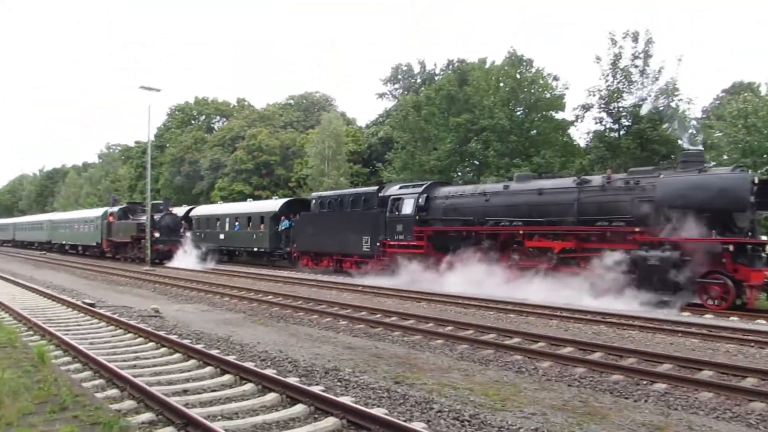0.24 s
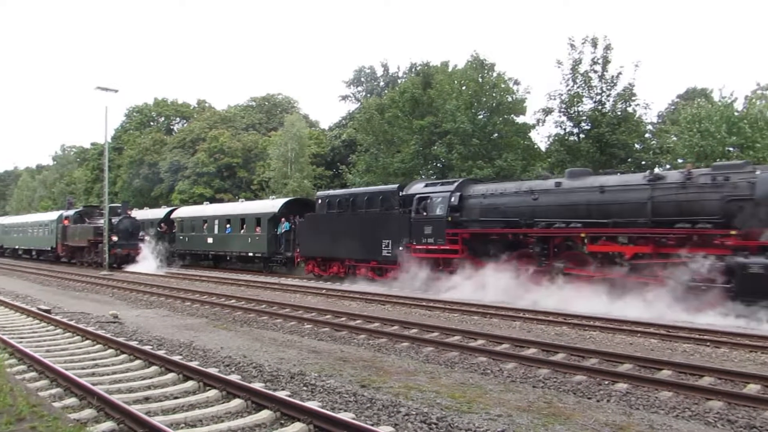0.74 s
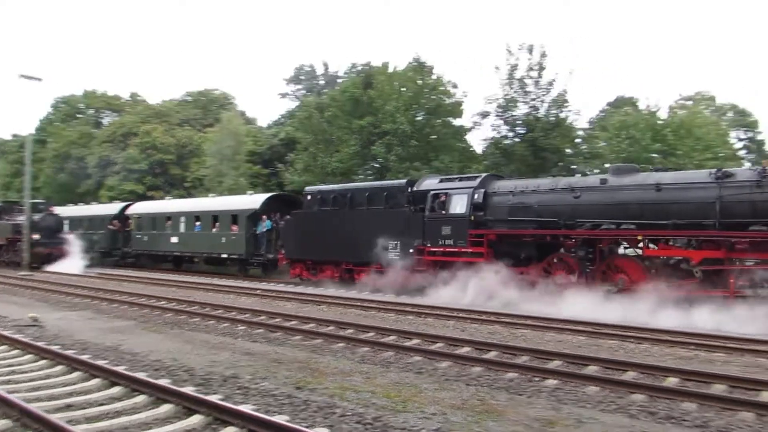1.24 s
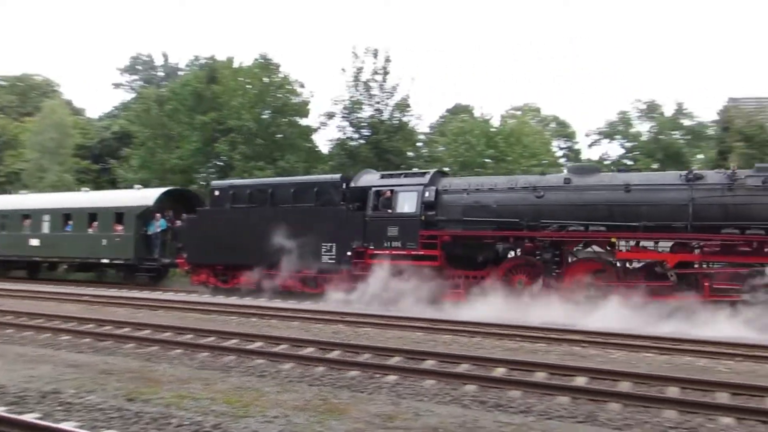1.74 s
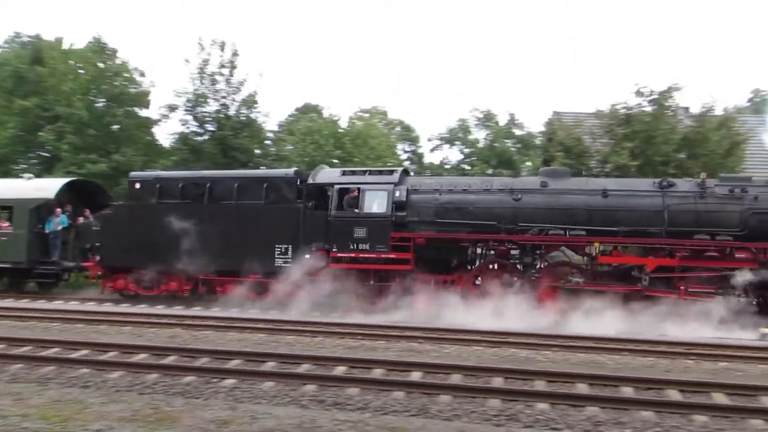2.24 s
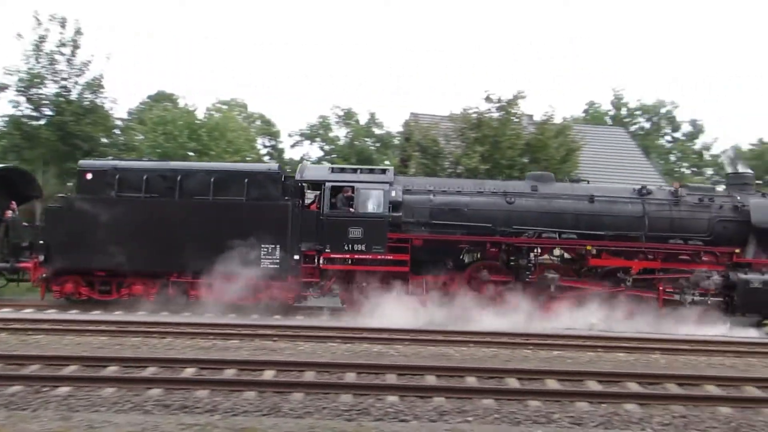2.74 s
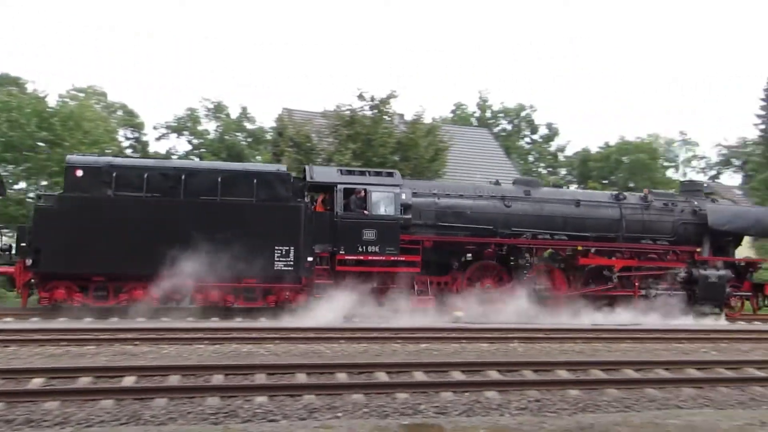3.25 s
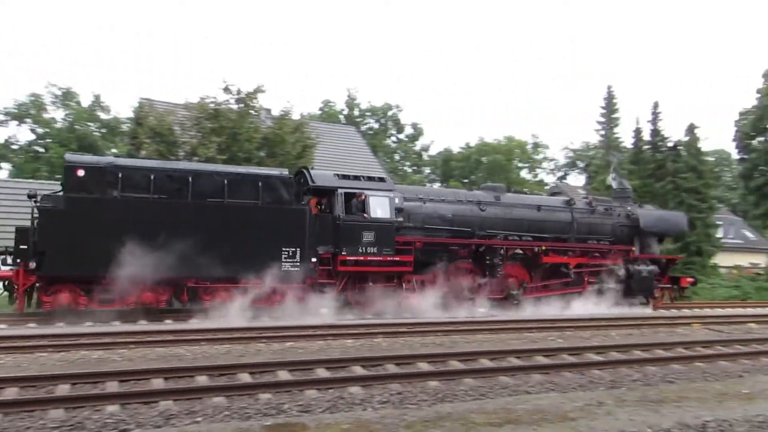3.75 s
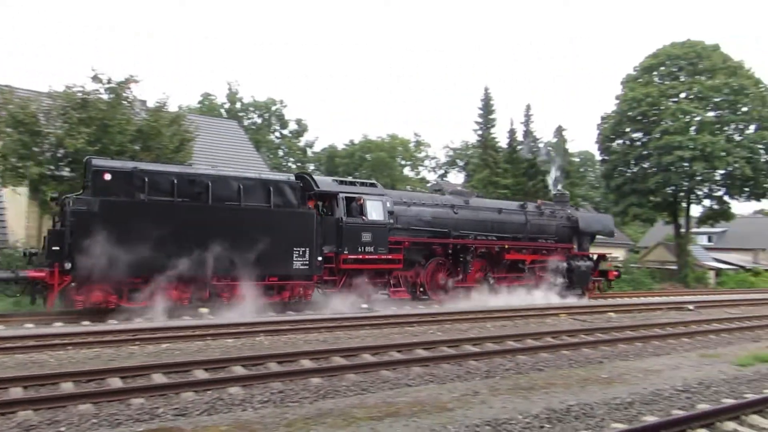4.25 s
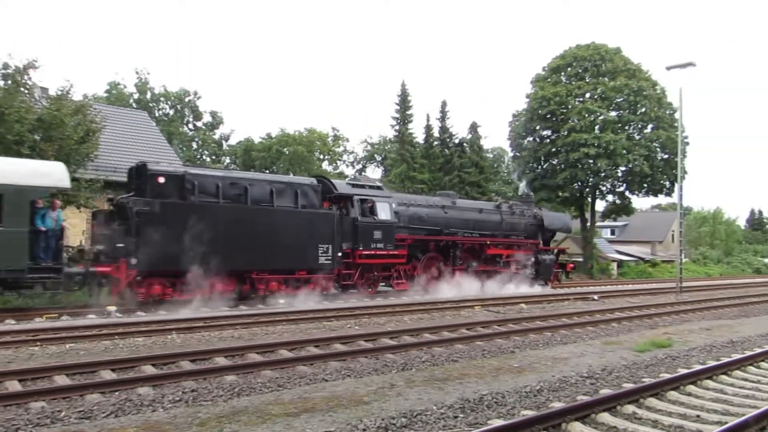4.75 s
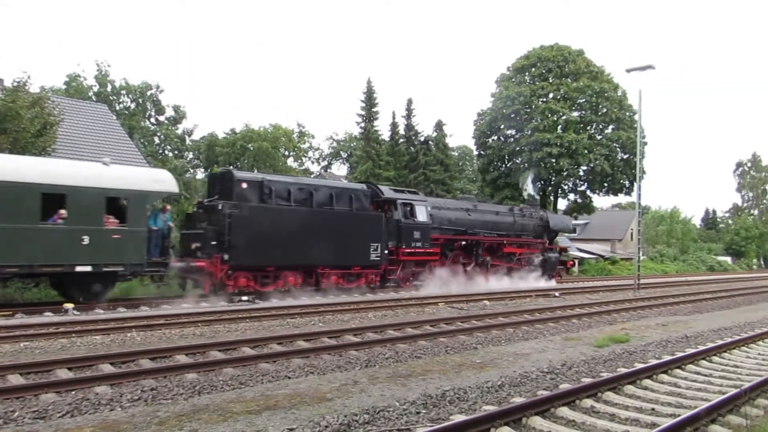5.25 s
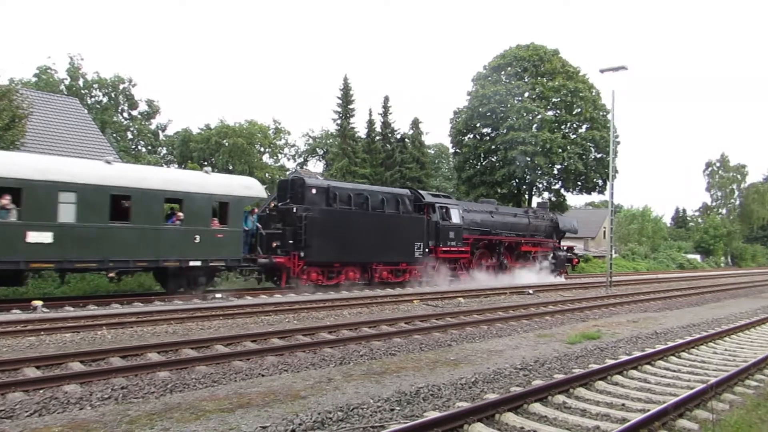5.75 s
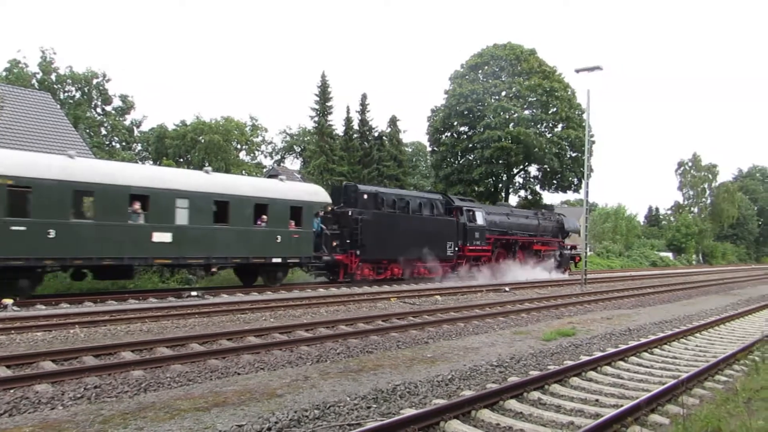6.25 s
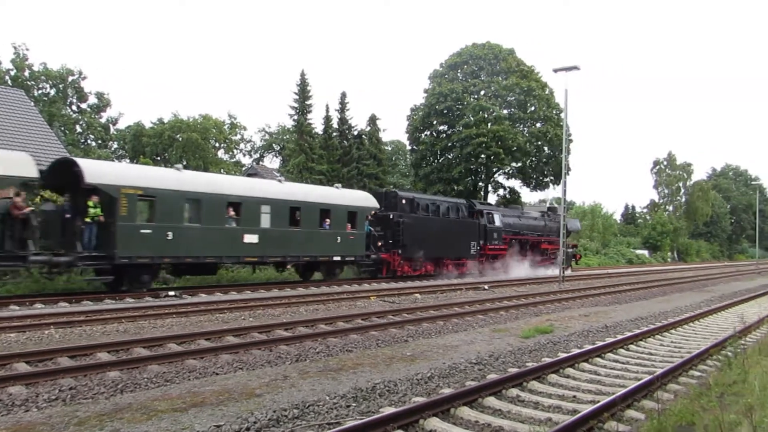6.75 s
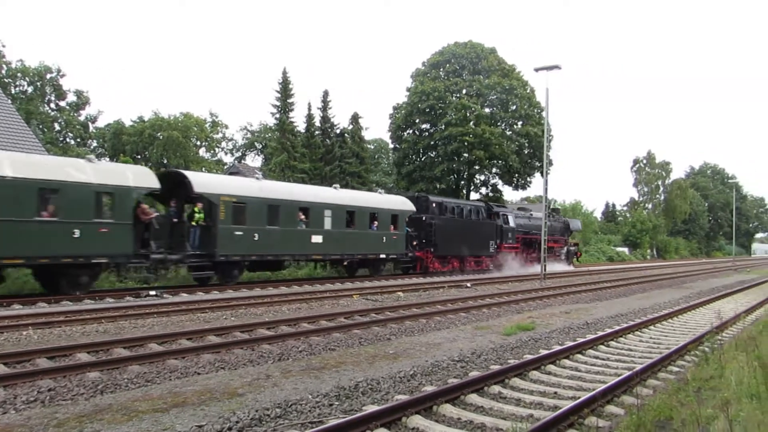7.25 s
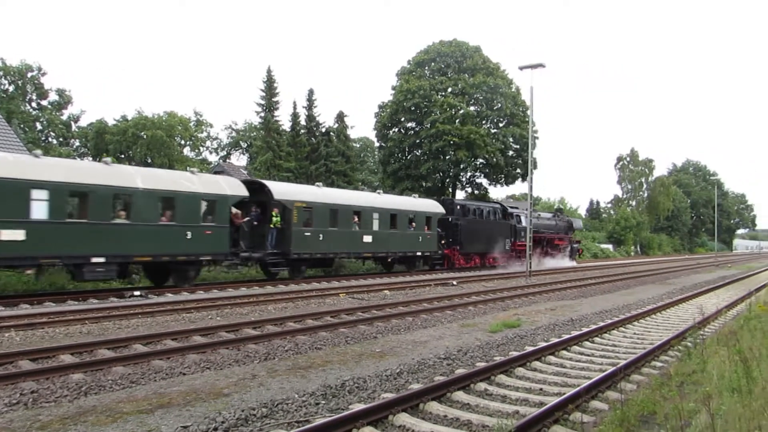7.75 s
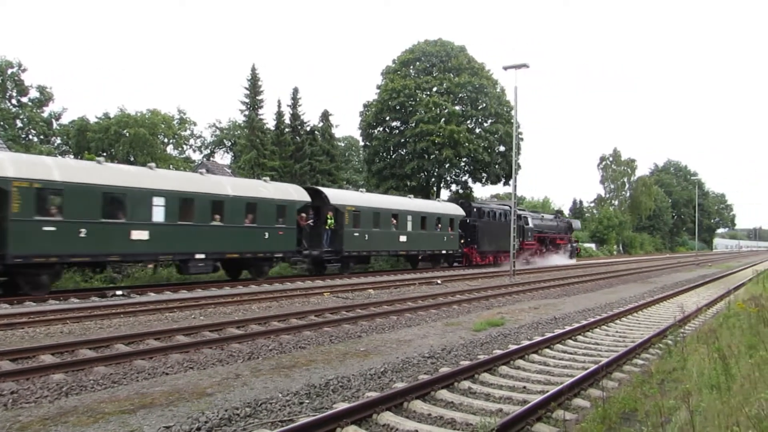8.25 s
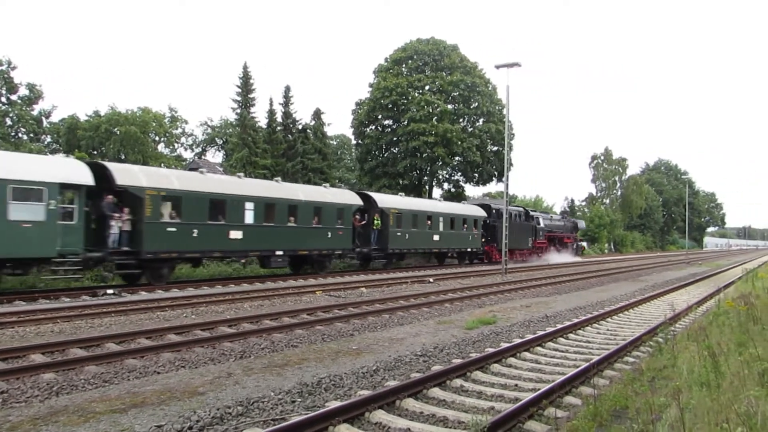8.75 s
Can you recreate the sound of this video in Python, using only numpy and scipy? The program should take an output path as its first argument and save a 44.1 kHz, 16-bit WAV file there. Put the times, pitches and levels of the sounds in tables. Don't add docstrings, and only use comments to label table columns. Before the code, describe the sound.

Fast, steady chuffing from a heavy steam engine with pulsing cylinder hiss and deep ground rumble, giving way to rolling coaches and singing rails.

```python
import sys
import numpy as np
from scipy import signal
from scipy.fft import rfft, irfft, next_fast_len
from scipy.io import wavfile
from scipy.ndimage import uniform_filter1d

SR = 44100
rng = np.random.default_rng(int(sys.argv[2]) if len(sys.argv) > 2 else 0)


def linear_from_db(decibels):
    return 10 ** (np.asarray(decibels, float) / 20)


def log_audio(samples):
    frames = np.atleast_2d(samples).T
    limited = np.clip(frames, -1, 1)
    pcm = np.round(limited * 32767).astype(np.int16)
    wavfile.write(sys.argv[1], SR, pcm)


N = 397782

# [t/s, peak level/dB, body level re peak/dB]
SPURTS = [(0.0352, -36.5, -9), (0.3725, -53, -6), (0.69, -32.5, -13), (1.0313, -33.5, -7.5),
          (1.3588, -34, -7.5), (1.6793, -48, -13), (2.008, -28, -9), (2.3351, -37.5, -4.5),
          (2.6569, -33.5, -6.5), (2.971, -45.5, 3.5), (3.308, -35, -11), (3.6192, -40, -7.5),
          (3.9396, -37.5, -9), (4.253, -37.5, -5), (4.5697, -36, -10), (4.8773, -39, -5),
          (5.1847, -30, -15), (5.5002, -34, -12), (5.825, -34, -14), (6.123, -36.5, -9),
          (6.4227, -31.5, -18), (6.7091, -53, -9), (7.0327, -36, -17), (7.349, -43, -15),
          (7.6344, -29.5, -28), (7.9418, -41, -7), (8.226, -36, -12), (8.5294, -50, 0), (8.8244, -40, -12)]
# [t/s, low hollow re boom/dB, hollow re roar/dB,
# rasp re roar/dB, thin edge of the hiss re leak/dB]
ASPECT = [
    (0, -14, -20, -7.5, -1),
    (2.3, -7.5, -10, -8, -1),
    (4, -9.5, -16, -7.5, -10),
    (4.7, -5.5, -4.5, -8, -31),
    (7, -7.5, -2, -5.5, -16),
    (9, -4.5, -26, -9, -11),
]


def evened(x):
    return x / np.sqrt(np.mean(x ** 2, -1, keepdims=True) + 1e-20)


def curve(points):
    f, db = np.transpose(points)
    return lambda hz: linear_from_db(np.interp(np.log(hz + 1), np.log(f + 1), db))


def modes(table):
    def colour(hz):
        peaks = [linear_from_db(db) / (1 + (2 * (hz - f) / width) ** 2) for f, width, db in table]
        return np.sqrt(sum(peak ** 2 for peak in peaks))
    return colour


def noise(colour, *shape):
    size = next_fast_len(shape[-1])
    spectrum = rfft(rng.standard_normal(shape[:-1] + (size,)))
    spectrum = spectrum * colour(np.fft.rfftfreq(size, 1 / SR))
    return evened(irfft(spectrum, size)[..., :shape[-1]])


def flutter(depth_db, span_s):
    span = max(int(span_s * SR / 64), 1)
    steps = evened(uniform_filter1d(rng.standard_normal(N // 64 + 2), span))
    return linear_from_db(depth_db * np.interp(np.arange(N) / 64, np.arange(len(steps)), steps))


def along(table):
    s, *columns = np.transpose(table)
    return [np.interp(np.arange(N) / SR, s, c) for c in columns]


def burst(colour, rise_s, hold_s, t60):
    t = np.arange(round(.3 * SR)) / SR
    after = np.maximum(t - rise_s - hold_s[:, None], 0)
    rise = np.sin(np.pi / 2 * np.clip(t / rise_s, 0, 1)) ** 2
    shape = rise * linear_from_db(-60 * after / t60[:, None] - 144 * t)
    puffs = noise(colour, len(shape), len(t)) * shape
    return puffs / np.sqrt(np.mean(puffs[:, 600:3200] ** 2, -1, keepdims=True))


def add(mix, s, sound):
    part = mix[max(round(s * SR), 0):][:len(sound)]
    part += sound[:len(part)]


def beats():
    # [first beat t/s, boom level of its four beats/dB (4 columns)]
    turns = [(0.063, -23, -20.5, -19.5, -18), (0.724, -19, -23.5, -19, -16.5),
             (1.38, -19.5, -15, -20, -20.5), (2.029, -17, -18.5, -17.5, -16.5),
             (2.68, -18.5, -17, -20.5, -17.5), (3.321, -17, -14.5, -19.5, -15),
             (3.961, -22, -17.5, -20, -21), (4.588, -20.5, -17.5, -20.5, -16.5),
             (5.211, -15, -18, -19, -17), (5.838, -14.5, -17, -18, -17), (6.447, -17.5, -15, -16.5, -15),
             (7.057, -16.5, -17.5, -16.5, -19), (7.653, -22, -15, -21.5, -23.5),
             (8.247, -25, -23.5, -18.5, -19.5), (8.842, -17.5, -18, -19, -19)]
    rings = [(-21.5, -20, -20.5, -18.5), (-21, -18, -18, -19.5), (-17.5, -19, -23, -17),
             (-18, -17, -19.5, -16), (-16.5, -18, -20.5, -17), (-22, -21.5, -20.5, -21.5),
             (-23.5, -19.5, -24, -24.5), (-23, -24, -26.5, -21), (-26.5, -26, -27.5, -30.5),
             (-23, -23, -25, -20.5), (-24.5, -19.5, -28.5, -25.5), (-19.5, -25.5, -24.5, -21),
             (-28, -19, -27, -20.5), (-22.5, -19.5, -24, -26), (-22, -23, -21, -21)]
    # [share of the turn, jet level/dB]
    valves = [
        (0, .5),
        (.257, -0.5),
        (.503, 0),
        (0.751, -0.9),
    ]
    first, boom_db = np.array(turns)[:, 0], np.array(turns)[:, 1:]
    share, jet_db = np.transpose(valves)
    turn_s = np.diff(first, append=2 * first[-1] - first[-2])
    s = first[:, None] + share * turn_s[:, None]
    heard = s < N / SR
    return [c[heard] for c in (s, boom_db, np.array(rings), jet_db + 0 * s)]


def chimney():
    # [f/Hz, width/Hz, level/dB]
    thump = [(45.7, 55, 8), (83, 51, 3.5)]
    # [f/Hz, width/Hz, level/dB]
    boom = [(152.8, 30.5, -3), (189.3, 27.5, -.5)]
    # [f/Hz, width/Hz, level/dB]
    upper = [(294.7, 50, 1), (355, 53, -1)]
    # [f/Hz, width/Hz, level/dB]
    roar = [(609, 120, -1.5), (711, 64, -1), (802, 110, -3.5), (926, 280, -4)]
    # [f/Hz, level per Hz/dB]
    rasp = [(300, -2.5), (1100, -1.5), (1500, 4), (2200, -0.5), (3500, -8), (7000, -10.5), (13000, -57)]
    # [t/s, roar level/dB, valve open/s]
    jet = [(0, -35.5, 0.2), (.6, -31, 0.068), (1.6, -31.5, 0.021), (2.2, -28, 0.072), (3.2, -28.5, 0.033),
           (3.8, -32, 0.022), (5, -32, 0.032), (5.9, -32, 0.05), (6.6, -31, 0.025), (7.6, -32, 0.078),
           (8.4, -32, .05), (8.85, -29.5, 0.044)]
    s, boom_db, ring_db, jet_db = beats()

    def at_beats(table):
        at, *columns = np.transpose(table)
        return [np.interp(s, at, c) for c in columns]

    low_gap_db, gap_db, rasp_db, _ = at_beats(ASPECT)
    roar_db, open_s = at_beats(jet)
    roar_db = roar_db + jet_db + 0.21 * (ring_db - uniform_filter1d(ring_db, size=5))
    open_s = np.maximum(open_s + .004 * (-20.5 - boom_db), 0)
    knot = modes([(rng.uniform(577, 870, (len(s), 1)), 70, 0)])
    low_gap, gap = modes([(241, 34, 0)]), modes([(499, 184, 0)])
    layers = [  # colour, level/dB, t60/s of the decay after the valve shuts (added to the steady sag)
        (modes(thump), boom_db - 9, .7), (modes(boom), boom_db - .6, 1.1),
        (low_gap, boom_db + low_gap_db, 1.05), (modes(upper), ring_db - 2.5, 1.1),
        (gap, roar_db + gap_db, .9), (modes(roar), roar_db - 2.5, .9),
        (knot, roar_db - 6.0, .6), (curve(rasp), roar_db + rasp_db, .8)]
    out = np.zeros(N)
    for colour, db, t60 in layers:
        puffs = burst(colour, 0.04, 0.93 * open_s, t60 + 0 * s)
        for at, level_db, puff in zip(s, db, puffs):
            add(out, at - .016, linear_from_db(level_db) * puff)
    return out * flutter(0.94, .012)


def leak():
    # [swell level/dB, shut level before the back stroke/dB, reopened level/dB]
    leaks = [(-47, -61, -50.5), (-46, -58.5, -50), (-45, -61, -52.5), (-44.5, -57, -47),
             (-45, -57.5, -49.5), (-45.5, -58, -52), (-48, -56, -52), (-46.5, -57, -49.5),
             (-47, -55.5, -51), (-47.5, -56.5, -51), (-47.5, -55, -51), (-51, -57.5, -51.5),
             (-51, -58, -53.5), (-51.5, -56, -52), (-49.5, -57, -54)]
    s = np.transpose(SPURTS)[0]
    front, back = s[::2], np.append(s[1::2], s[-1] + 0.26)
    swell_db, shut_db, open_db = np.transpose(leaks)
    waning_db = (swell_db + shut_db) / 2
    stages = [
        (front, swell_db, (-0.082, -3, -.3)),
        (front, swell_db, (0.022, 0, -0.72)),
        (front, swell_db, (0.094, -2.85, -0.6)),
        (back, waning_db, (-0.092, -.5, 0.55)),
        (back, shut_db, (-0.025, 0, 0.24)),
        (back, open_db, (0.018, 0, 0.98)),
        (back, open_db, (0.06, -1.8, 0.23))]
    rows = np.array([[at + late_s, db + re_db, full_db + 0 * at]
                     for at, db, (late_s, re_db, full_db) in stages])
    return along(rows.transpose(2, 0, 1).reshape(-1, 3))


def cocks():
    # [f/Hz, level/dB]
    fizz = [(5000, -21), (7600, -4.5), (8500, -8.5), (10500, -3.5), (12500, -9.5), (13500, -17.5),
            (14200, -18), (15000, -30)]
    # [f/Hz, level/dB]
    lower_hiss = [(700, 1.5), (1500, -4.5), (3000, -7), (4500, -0.5), (5600, 2.5), (7000, -4),
                  (8500, -40.5), (14000, -50)]
    # [f/Hz, level/dB]
    edge_hiss = [(5500, -16), (6600, -1), (7400, -1), (8500, -14), (11500, -13), (13300, -11.5),
                 (14500, -30), (15200, -60)]
    # [f/Hz, level/dB]
    spit = [(3000, -42), (4300, -1.5), (5000, 1.5), (6000, 2), (7200, -3.5), (8500, -32), (11000, -10.5),
            (14500, -47)]
    # [f/Hz, level/dB]
    body = [(1000, -21), (1900, -2), (2600, 7), (3400, 3.5), (5000, -7), (12000, -50)]
    leak_db, full_db = leak()
    hiss = noise(curve(fizz), N) + linear_from_db(full_db + 4.0) * noise(curve(lower_hiss), N)
    out = linear_from_db(leak_db + 7.0) * hiss
    edge_db = along(ASPECT)[-1]
    out += linear_from_db(leak_db + 8.5 + edge_db) * noise(curve(edge_hiss), N)
    s, peak_db, body_db = np.transpose(SPURTS)
    for table, level_db in (spit, peak_db - 6.0), (body, peak_db + body_db - 0.5):
        puffs = burst(curve(table), 0.0099, 0.045 + 0 * s, 0.35 + 0 * s)
        for at, db, puff in zip(s, level_db, puffs):
            add(out, at - .004, linear_from_db(db) * puff)
    return out * flutter(0.4, .015)


def wheels():
    # [t/s, ground level/dB, rumble level/dB, coach level/dB, rail song level/dB]
    rolling = [
        (0, -35.5, -30.4, -40.5, -66),
        (2.2, -28.5, -26.5, -40, -55),
        (4.2, -28, -26, -38.5, -47.5),
        (6.8, -26.5, -26, -34, -41.5),
        (7.8, -28.5, -23, -34.5, -39.4),
        (9.02, -33, -20, -30, -37),
    ]
    # [f/Hz, level per Hz/dB]
    ground = [(15, -8), (30, -0.5), (50, 8.5), (65, 2.5), (90, 0), (150, -26), (400, -100)]
    # [f/Hz, level/dB]
    rumble = [(40, -15), (68, 1.5), (150, 0.6), (230, -12.5), (310, -2.5), (450, -15.5), (700, -36.5),
              (14000, -78)]
    # [f/Hz, level/dB]
    coaches = [(250, -5.5), (420, -3.5), (550, -7), (750, -3.5), (1200, -10.5), (2500, -12), (3600, -22.5),
               (13500, -52)]
    # [f/Hz, width/Hz, level/dB]
    rails = [(1369, 96, -6.5), (1454, 60, -6), (1552, 48, -3), (1646, 82, -6)]
    ground_db, rumble_db, coach_db, rail_db = along(rolling)
    low = linear_from_db(rumble_db) * noise(curve(rumble), N) + linear_from_db(ground_db) * noise(curve(ground), N)
    coach = linear_from_db(coach_db) * noise(curve(coaches), N) * flutter(0.76, 0.088)
    turn = 2 * np.pi * np.cumsum(1575 * flutter(0.14, .2)) / SR
    a, b = noise(modes([(0, 53, 0)]), 2, N)
    strand = linear_from_db(-5) * (a * np.cos(turn) + b * np.sin(turn))
    song = (noise(modes(rails), N) + strand) * flutter(0.95, .08)
    return low + coach + linear_from_db(rail_db - 1.3) * song


def scene():
    return np.tile(chimney() + cocks() + wheels(), (2, 1))


def without_whines(x):
    # [f/Hz, width/Hz]
    whines = [(3935, 300), (7870, 190)]
    for hz, width in whines:
        x = .93 * signal.lfilter(*signal.iirnotch(hz, hz / width, SR), x) + .07 * x
    return x


def left_spectrum(left, hz):
    # [f/Hz, share copied faithfully from the right, level/dB]
    copied = [(600, .996, 0), (1500, .96, 0), (2500, .86, 0), (4500, .72, -1.5), (7000, .55, -1),
              (8500, .25, 1.5), (10500, .04, -1), (13000, .03, 2)]
    at, share, left_db = np.transpose(copied)
    share, left_db = (np.interp(hz, at, c)[:, None] for c in (share, left_db))
    scrambled = 2.7 * np.exp(2j * np.pi * rng.random(left.shape))
    left = left * linear_from_db(left_db) * (np.sqrt(1 - share) * scrambled - np.sqrt(share))
    sound = signal.istft(left, nperseg=1024, noverlap=768)[1]
    return signal.stft(sound, nperseg=1024, noverlap=768)[2]


def without_faint(z, hz):
    # [f/Hz, left level per Hz/dB, right level per Hz/dB]
    gate = [(2000, -125, -125), (4000, -104, -101), (6000, -109, -103), (11500, -114, -102),
            (13000, -109, -99), (13700, -101, -95), (14200, -90, -87.5), (15000, -86, -90)]
    at, *floors = np.transpose(gate)
    floor_db = np.array([np.interp(hz, at, c) for c in floors])[..., None]

    def patch(x):
        return uniform_filter1d(uniform_filter1d(x, size=5, axis=1), size=5, axis=2)

    whim = uniform_filter1d(patch(rng.standard_normal(z.shape)), size=5, axis=2)
    whim_db = np.array([[[42]], [[27]]]) * whim
    return z * (patch(abs(z) ** 2) > linear_from_db(2 * (floor_db + whim_db)))


def roll_off(x):
    return signal.sosfilt(signal.butter(12, 14840, fs=SR, output="sos"), x)


def record(dry):
    dry = without_whines(dry)
    dulled = linear_from_db(-3.4) * signal.lfilter(*signal.butter(1, 1300, fs=SR), dry[0])
    tracks = np.array([dulled, dry[1]])
    hz, _, z = signal.stft(tracks, SR, nperseg=1024, noverlap=768, scaling="psd")
    z[0] = left_spectrum(z[0], hz)
    z = without_faint(z, hz)
    mix = signal.istft(z, SR, nperseg=1024, noverlap=768, scaling="psd")[1][:, :N]
    return roll_off(mix)


dry = scene()
out = record(dry)
log_audio(out)
```